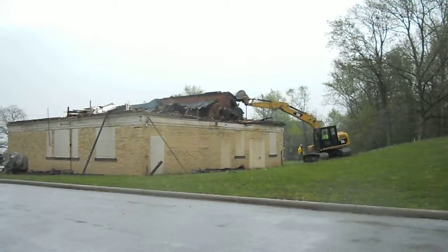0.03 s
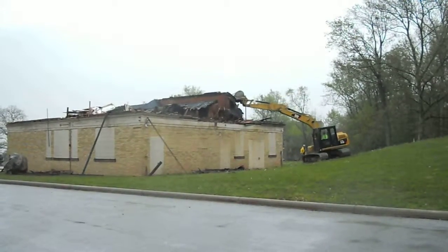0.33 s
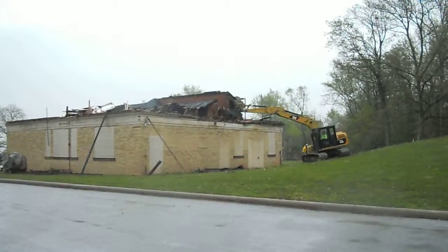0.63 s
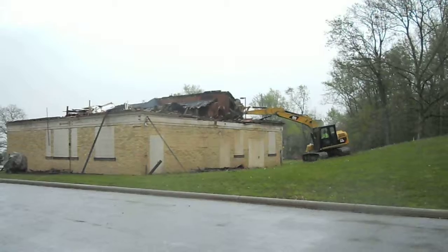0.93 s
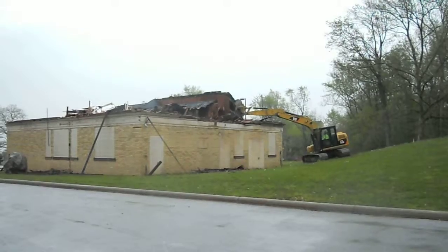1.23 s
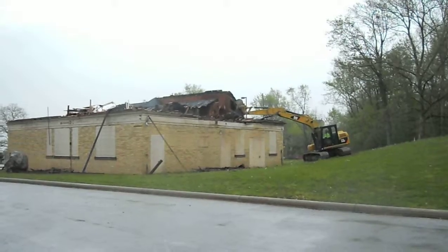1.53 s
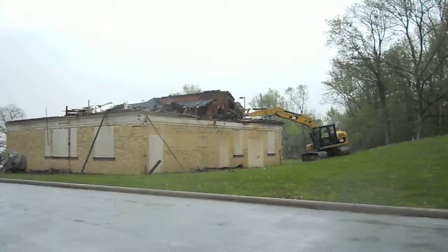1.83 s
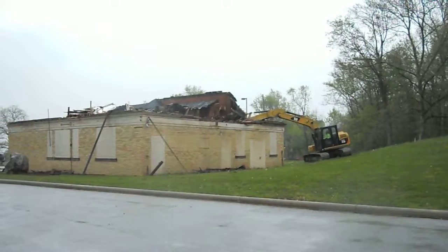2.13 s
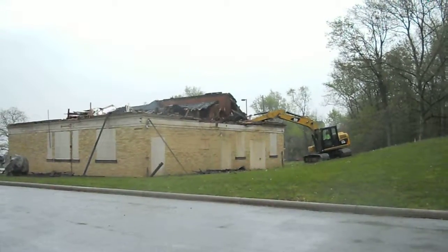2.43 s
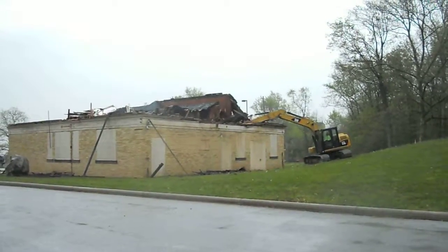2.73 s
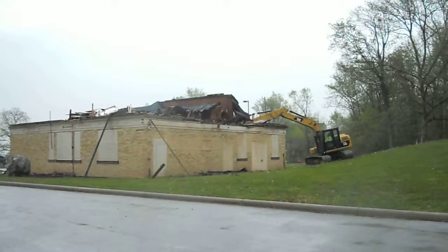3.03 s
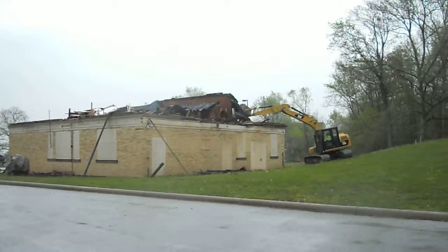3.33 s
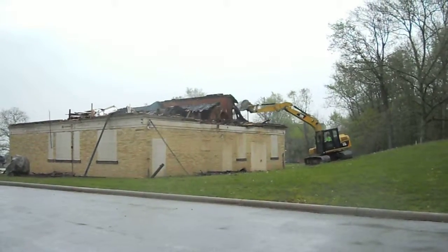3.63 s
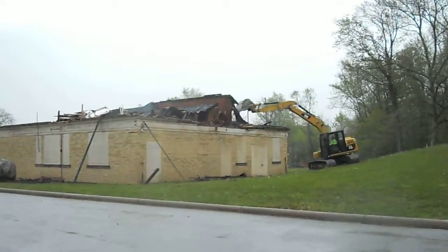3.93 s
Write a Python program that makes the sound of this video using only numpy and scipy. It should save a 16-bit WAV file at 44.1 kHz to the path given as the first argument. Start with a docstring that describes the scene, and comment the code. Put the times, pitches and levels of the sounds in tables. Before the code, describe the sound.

Timber cracks and crunches as a distant excavator tears off a roof, its diesel engine droning throughout. Brief hydraulic hisses come in the first half second, then a loud crack and knock at 0.7 seconds. Splintering, board knocks and low booms continue, echoing dully, until about 2.7 seconds. A short scrape and more cracks follow from 3.2 to 3.5 seconds. Light wind rumbles, and scattered ticks sound close by.

```python
"""A diesel drones and timber cracks as an excavator, some way off, pulls the roof off a brick building.
The engine's firing pulses make the drone, and oil hisses briefly through the hydraulic valves.
Beams break fibre by fibre, boards crunch and knock, the roof deck booms and roofing sheets scrape,
all with a dull echo from walls and trees.
Wind rumbles lightly on the microphone, and a few sharp ticks sound close by."""
import sys
import numpy as np
from scipy import signal
from scipy.fft import rfft, irfft
from scipy.io import wavfile

SR = 44100
rng = np.random.default_rng(int(sys.argv[2]) if len(sys.argv) > 2 else 0)


def pcm_store(signal):
    """Save signal as 16-bit PCM."""
    levels = np.round(np.clip(np.atleast_2d(signal), -1, 1) * 32767)
    wavfile.write(sys.argv[1], SR, levels.astype(np.int16).T)


N = 176400
TIME = np.arange(N) / SR


def amp(db):
    """Amplitude ratio of a level in decibels."""
    return 10 ** (np.asarray(db) / 20)


def rms(x):
    """Root-mean-square amplitude."""
    return np.sqrt(np.mean(x ** 2) + 1e-20)


def unit(x):
    """Normalisation to an rms of 1."""
    return x / rms(x)


def curve(rows):
    """Linear interpolation between (seconds, value) rows."""
    return np.interp(TIME, *np.transpose(rows))


def add(mix, start, sound):
    """Superposition of a sound on the mix, from a start in seconds."""
    part = mix[max(round(start * SR), 0):][:len(sound)]
    part += sound[:len(part)]


def colour(x, spectrum, size=4096):
    """Minimum-phase filtering at unit energy: the (Hz, dB) rows set only the spectral shape."""
    hz, db = np.transpose(spectrum)
    freqs = abs(np.fft.fftfreq(size, 1 / SR)) + 1
    log_gain = np.log(amp(np.interp(np.log(freqs), np.log(hz), db)))
    response = np.exp(np.conj(signal.hilbert(log_gain)))
    taps = np.fft.ifft(response).real[:size // 2]
    return signal.oaconvolve(x, taps / np.linalg.norm(taps))[:len(x)]


def band(hz, width_hz):
    """Noise through a steep resonance; centred on 0 Hz it is a random fluctuation."""
    freqs = np.fft.rfftfreq(N, 1 / SR)
    attenuation = (1 + ((freqs - hz) / width_hz) ** 2) ** 2
    return unit(irfft(rfft(rng.standard_normal(N)) / attenuation, N))


def fractures(per_s, spread_db):
    """Shot noise: tiny fractures are impulses of random time, sign and size."""
    size = amp(spread_db * np.minimum(rng.exponential(1, N), 4))
    return unit(size * rng.choice([-1, 1], N) * (rng.random(N) < per_s / SR))


def burst(start, rise, decay):
    """Envelope of linear growth and exponential decay."""
    t = TIME - start
    return np.clip(t / rise, 0, 1) * np.exp(-np.clip((t - rise) / decay, 0, 40))


# Strength of the buffeting. Each row: time in seconds, level in dB.
GUST_LEVEL = [(0, -50), (.2, -31), (.4, -40), (.6, -26), (.8, -43), (.95, -37), (1.25, -48), (2, -53),
              (2.4, -42), (2.75, -36.5), (3.1, -34), (3.4, -33), (4, -48)]
# Spectrum of the buffeting. Each row: frequency in Hz, relative density in dB.
WIND_SPECTRUM = [(8, 8), (20, 0.5), (45, -3), (90, -4), (200, -40), (800, -51)]

def wind():
    """Turbulence: pressure fluctuations at the microphone make a low rumble."""
    rumble = colour(rng.standard_normal(N), WIND_SPECTRUM, size=16384)
    return unit(rumble) * amp(curve(GUST_LEVEL))


# Engine speed under load. Each row: time in seconds, firing rate in Hz.
FIRING_RATE = [(0, 59.5), (.3, 60.04), (.5, 58.03), (.69, 53.8), (.93, 57.04), (1.4, 57.77), (2.2, 58.42),
               (2.7, 61.9), (3.1, 62.3), (3.35, 60.1), (3.6, 61.94), (4, 64.13)]
# Exhaust strength. Each row: time in seconds, firing tone level in dB, overtone level in dB.
EXHAUST_LEVELS = [(0, -32, -32), (.28, -40, -27.5), (.38, -41, -34.5), (.58, -23, -28.5), (.78, -56, -41),
                  (1.1, -43, -42.5), (1.25, -42, -44), (1.6, -51, -52), (2.3, -45, -49), (2.85, -36, -38.5),
                  (3.3, -29, -39), (3.7, -37.5, -35), (4, -30.5, -41)]
# Exhaust overtones. Each row: multiple of the firing rate, relative level in dB.
ENGINE_ORDERS = [(2, 0), (3, -4.5), (4, -28.5), (4.5, -6.5), (5, -18.5), (6, -9)]
# Strength of the fan and machinery roar. Each row: time in seconds, level in dB.
MACHINERY_LEVEL = [(0, -27.5), (.4, -28.5), (.65, -25.5), (1.05, -30.5), (1.22, -36.5), (1.32, -40),
                   (1.56, -39.5), (1.8, -30.5), (2.3, -28.5), (2.58, -31), (2.9, -30), (3.2, -27),
                   (3.7, -27.5), (4, -29)]
# Spectrum of that roar. Each row: frequency in Hz, relative density in dB.
MACHINERY_SPECTRUM = [(40, -4.5), (90, -1.5), (170, 0.5), (280, -5.5), (390, -9.5), (560, -5.5), (800, -6),
                      (1150, -3.5), (1500, -9.5), (2200, -20), (3200, -12), (4300, -19.5), (5400, -27),
                      (6600, -21.5), (8000, -30.5), (10000, -30.5), (11000, -45), (12000, -52)]

def engine(waver=0.0199, flutter=0.36, throb=0.1, swell_db=1):
    """Periodic excitation: cylinder firing makes the exhaust tones and modulates the machinery roar."""
    firing_hz = curve(FIRING_RATE) * (1 + waver * band(0, 17.6))
    phase = 2 * np.pi * np.cumsum(firing_hz) / SR
    overtones = np.zeros(N)
    for order, db in ENGINE_ORDERS:
        gain = amp(db) * (1 + flutter * band(0, 9.8))
        overtones += gain * np.cos(order * phase + 2 * np.pi * rng.random())
    times, firing_db, overtone_db = np.transpose(EXHAUST_LEVELS)
    exhaust = amp(np.interp(TIME, times, firing_db)) * unit(np.cos(phase))
    exhaust += amp(np.interp(TIME, times, overtone_db)) * unit(overtones)
    roar = colour(rng.standard_normal(N) * (1 + throb * np.cos(phase)), MACHINERY_SPECTRUM)
    roar_db = curve(MACHINERY_LEVEL) + swell_db * band(0, 38)
    return exhaust + amp(roar_db) * unit(roar)


# Valve hisses. Each row: peak time in seconds, half length in seconds, centre in Hz, width in Hz,
# level in dB.
VALVE_HISSES = [(0.464, 0.037, 6540, 1100, -35.5), (0.27, 0.072, 4320, 250, -40.5),
                (.22, 0.015, 6400, 860, -37)]

def hydraulics():
    """Flow noise: oil forced through the valves hisses in brief Gaussian swells."""
    return sum(amp(db) * np.exp(-((TIME - peak) / half) ** 2 / 2) * band(hz, width)
               for peak, half, hz, width, db in VALVE_HISSES)


# Nearby ticks. Each row: start in seconds, level in dB, centre frequency in Hz.
CLOSE_TICKS = [(.069, -22, 5150), (0.07, -15.5, 1490), (0.2168, -9, 5440), (0.792, -19, 7000),
               (0.945, -9.5, 5580), (0.956, -8, 6340), (.97, -28, 8000), (1.34, -30, 4940),
               (1.37, -23, 4200), (1.4385, -23, 6300), (2.307, -21.5, 7300), (2.659, -12, 5210),
               (2.6602, -15, 2880), (3.199, -20, 10000), (3.415, -13.5, 9000), (3.603, -21, 6520)]

def ticks(decay_s=0.00076, width_oct=0.67, size=512):
    """Heavily damped transients: broad bands of noise die so fast that each is heard as a tick."""
    out = np.zeros(N)
    freqs = np.fft.rfftfreq(size, 1 / SR)
    envelope = np.exp(-TIME[:size] / decay_s)
    for start, db, hz in CLOSE_TICKS:
        spectrum = 1 / (1 + (np.log2((freqs + 1) / hz) / width_oct) ** 2)
        noise = irfft(spectrum * np.exp(2j * np.pi * rng.random(len(freqs))))
        add(out, start, amp(db) * rms(envelope) * unit(envelope * noise))
    return signal.sosfilt(signal.butter(14, 9400, fs=SR, output="sos"), out)


def echo(x, gain_db=-9, t60_s=0.32, cutoff_hz=3470, reflections_per_s=1500, gap_s=.012):
    """Scattering: walls and trees return many delayed copies, weaker in the treble."""
    t = TIME[:SR // 2]
    taps = rng.standard_normal(len(t)) * (rng.random(len(t)) < reflections_per_s / SR)
    taps *= amp(-60 * t / t60_s) * (t > gap_s)
    taps = signal.lfilter(*signal.butter(1, cutoff_hz, fs=SR), taps / np.linalg.norm(taps))
    return amp(gain_db) * signal.oaconvolve(x, taps)[:N]


# Slips of the roofing sheets. Each row: start, rise and decay in seconds, centre in Hz, level in dB.
SHEET_SCRAPES = [(3.212, 0.011, 0.017, 4900, -28), (3.24, .012, .025, 4700, -30)]

def scrapes(width_hz=550, chatter_db=1.5):
    """Sliding friction: roofing sheets give a bright rasp whose level chatters."""
    rasp = sum(amp(db) * burst(start, rise, decay) * band(hz, width_hz)
               for start, rise, decay, hz, db in SHEET_SCRAPES)
    return rasp * unit(amp(chatter_db * band(0, 200)))


# Impacts of loose boards. Each row: start in seconds, level in dB, decay in seconds, main mode in Hz,
# second mode in Hz, its level relative to the main mode in dB.
BOARD_KNOCKS = [(.114, -16, 0.011, 1055, 520, -8), (.586, -11, 0.015, 1009, 500, -6),
                (.695, -2, 0.007, 1081, 1232, -7), (1.026, -19, .016, 700, 996, -9),
                (1.118, -18, 0.023, 947, 653, 0), (1.966, -20, 0.017, 617, 870, -7),
                (2.096, -19, 0.01, 1036, 657, 1), (2.226, -20, .012, 873, 1396, -7),
                (2.325, -25, 0.016, 992, 704, -9), (3.209, -22, 0.007, 1128, 2100, -8),
                (3.371, -20, .014, 1020, 870, 2), (3.417, -13.5, 0.0064, 1010, 1600, 1),
                (3.4255, -10.5, 0.0038, 3440, 1710, -10)]

def knocks(rise_s=0.002):
    """Damped free vibration: loose boards strike each other and ring in two modes."""
    out, t = np.zeros(N), TIME[:SR // 4]
    for start, db, decay, hz, second_hz, second_db in BOARD_KNOCKS:
        modes = np.sin(2 * np.pi * hz * t) + amp(second_db) * np.sin(2 * np.pi * second_hz * t)
        envelope = np.minimum(t / rise_s, 1) * np.exp(-t / decay)
        add(out, start, amp(db) * envelope * modes)
    return out


# Flexing of the roof deck. Each row: start, rise and decay in seconds, pitch in Hz, level in dB.
DECK_BOOMS = [(0.101, .008, 0.032, 164.4, -20), (.233, 0.0073, 0.021, 185, -20.5),
              (.52, 0.037, 0.047, 188, -27.5), (.68, 0.0097, .04, 207, -31),
              (.825, 0.01, 0.031, 185.6, -24.5), (.88, 0.022, 0.0089, 166.3, -18.5),
              (0.974, 0.056, 0.039, 181, -22), (1.643, 0.0097, 0.027, 227, -27),
              (1.915, 0.05, 0.052, 249.7, -18), (3.36, 0.015, 0.031, 158.1, -23.5)]

def booms(waver_hz=15.43, noise_ratio=0.44, width_hz=67):
    """Plate resonance: the roof deck resounds at a low, wavering pitch as it gives way."""
    out = np.zeros(N)
    for start, rise, decay, hz, db in DECK_BOOMS:
        envelope = burst(start, rise, decay)
        phase = 2 * np.pi * np.cumsum(hz + waver_hz * band(0, 59.1)) / SR
        flex = np.sin(phase) + noise_ratio * band(hz, width_hz)
        out += amp(db) * rms(envelope) * unit(envelope * flex)
    return out


# Crushing of boards under the bucket. Each row: time in seconds, level in dB.
CRUSH_LEVEL = [(0, -55), (.48, -43), (.66, -43), (.72, -24.5), (.8, -29.5), (.87, -21), (.935, -27),
               (1.02, -22.5), (1.09, -32), (1.22, -40), (1.58, -39), (1.7, -23.5), (1.77, -38.5),
               (1.84, -25.5), (1.88, -28), (1.98, -22.5), (2.14, -29), (2.33, -31.5), (2.39, -38),
               (2.45, -26.5), (2.56, -50.5), (3.15, -42), (3.25, -24.5), (3.3, -27.5), (3.39, -24.5),
               (3.46, -29), (3.52, -42), (3.8, -30), (4, -50)]
# Response of the timber. Each row: frequency in Hz, relative gain in dB.
TIMBER_RESPONSE = [(60, -16.5), (170, 2.5), (270, -11.5), (390, -11.5), (600, 3), (780, -10), (980, 4),
                   (1300, -7), (1750, -7), (2500, -11.5), (3300, -14), (4600, -6.5), (5700, -20.5),
                   (7300, -18.5), (9200, -22.5), (10300, -35.5), (11500, -49)]

def crunch(clump_db=2.5):
    """Acoustic emission: clumps of small fractures are filtered by the resonances of the timber."""
    grains = fractures(per_s=3500, spread_db=3)
    clumps = amp(clump_db * band(0, 55))
    return colour(unit(grains * clumps) * amp(curve(CRUSH_LEVEL)), TIMBER_RESPONSE)


# Breaks in the beams. Each row: start, rise and decay in seconds, ring frequency in Hz,
# then the board, splinter and snap levels in dB.
BEAM_CRACKS = [(0.0979, .0006, 0.012, 696, -18.5, -15, -27.5),
               (0.231, 0.008, 0.032, 1030, -21.5, -28.5, -44),
               (0.521, 0.0063, 0.014, 970, -26.5, -22, -29.5), (0.564, 0.018, 0.02, 1040, -22, -27, -37),
               (.673, 0.0056, 0.019, 1330, -19, -15.5, -25.5),
               (0.6915, 0.0014, 0.0037, 1740, -15.5, -12, -20),
               (0.694, 0.004, 0.0045, 1480, -14.5, -17, -37),
               (.749, 0.0047, 0.012, 1140, -19.5, -20, -30.5), (.824, 0.0099, 0.01, 710, -25.5, -24, -29),
               (0.843, 0.0024, 0.01, 830, -27, -22, -32), (.859, 0.0014, 0.0055, 653, -21, -29, -31),
               (.899, .002, .008, 900, -31, -21, -32), (0.878, 0.0049, 0.013, 1040, -29, -19, -28),
               (0.974, .012, 0.0081, 1060, -25, -14.5, -19), (1.02, 0.013, 0.0092, 686, -25, -27, -41),
               (1.113, 0.0042, 0.026, 910, -29.5, -21.5, -31), (1.336, .004, 0.026, 1040, -32, -36, -43),
               (1.604, 0.0028, 0.0057, 950, -48, -30, -32), (1.625, 0.0018, 0.011, 1020, -31, -23, -39),
               (1.659, 0.0033, 0.015, 910, -23, -24, -39), (1.702, 0.0088, 0.01, 980, -34, -21.5, -37),
               (1.797, 0.022, 0.021, 670, -30.5, -23, -39), (1.913, 0.0054, 0.016, 910, -22.5, -21, -32.5),
               (1.954, 0.015, 0.019, 568, -20, -22.5, -40), (2.026, 0.0074, 0.044, 900, -23.5, -24, -38),
               (2.187, 0.0081, 0.017, 1010, -27.5, -23.5, -36.5), (2.305, .012, .02, 1000, -37, -41, -40),
               (2.41, .004, 0.016, 900, -26, -29, -35.5), (2.659, 0.0044, 0.007, 783, -23.5, -30, -42),
               (2.674, 0.011, 0.02, 910, -32, -27.5, -40), (3.359, 0.01, 0.012, 1130, -18, -22.5, -32.5),
               (3.4145, 0.0019, 0.0056, 1140, -18, -23, -27),
               (3.422, 0.0048, 0.0073, 1070, -19.5, -17.5, -30.5)]
# Response of a board. Each row: multiple of its ring frequency, relative gain in dB.
BOARD_RESPONSE = [(.08, -30), (.2, -14.5), (.38, -8.5), (.58, 4), (1, 5.5), (1.35, -5.5), (1.8, 1),
                  (2.6, -29), (5, -46)]
# Spectrum of the splintering. Each row: frequency in Hz, relative density in dB.
SPLINTER_SPECTRUM = [(800, 6.5), (1700, -4), (2400, -3), (2900, 0), (3700, 4.5), (4800, 5.5), (5700, -7),
                     (9000, -46)]
# Spectrum of the bright snap. Each row: frequency in Hz, relative density in dB.
SNAP_SPECTRUM = [(2500, -26.5), (5000, 0), (6500, 3.5), (7800, 2), (9400, -3), (10500, -9.5), (12000, -50),
                 (16000, -79)]

def cracks(ring_width_hz=99, ring_share=0.3):
    """Brittle fracture: a rush of breaking fibres drives a board's resonance, splinters and snaps."""
    fibres = fractures(per_s=10000, spread_db=2.6)
    boards, splinters, snaps = np.zeros((3, N))
    pole_radius = np.exp(-np.pi * ring_width_hz / SR)
    for start, rise, decay, hz, board_db, splinter_db, snap_db in BEAM_CRACKS:
        span = slice(round(start * SR), round(start * SR) + SR // 4)
        envelope = burst(start, rise, decay)[span]
        strength = rms(envelope)
        force = strength * unit(fibres[span] * envelope)
        body = unit(colour(force, [(ratio * hz, db) for ratio, db in BOARD_RESPONSE]))
        pole = pole_radius * np.exp(2j * np.pi * hz / SR)
        ring = unit(signal.lfilter([1], [1, -pole], force).real)
        board = unit(np.sqrt(1 - ring_share) * body + np.sqrt(ring_share) * ring)
        add(boards, start, amp(board_db) * strength * board)
        add(splinters, start, amp(splinter_db) * force)
        add(snaps, start, amp(snap_db) * force)
    return boards + colour(splinters, SPLINTER_SPECTRUM) + colour(snaps, SNAP_SPECTRUM)


def scene():
    """Superposition: the breaking roof and its echo add to the machine, the wind and the ticks."""
    roof = cracks() + crunch() + booms() + knocks() + scrapes()
    return (roof + echo(roof) + engine() + hydraulics() + wind() + ticks())[None]


def record(dry, ceiling=.73, knee=24, edge_hz=15500):
    """Band limiting and saturation: the microphone loses the top treble and flattens the highest peaks."""
    rolloff = signal.firwin2(255, [0, 10200, 11000, 12000, 12600, SR / 2], [1, 1, .6, .5, .01, 0], fs=SR)
    dull = signal.oaconvolve(dry, rolloff[None], "same")
    saturated = dull / (1 + (dull / ceiling) ** knee) ** (1 / knee)
    band_limit = signal.firwin(511, edge_hz, window=("kaiser", 9), fs=SR)
    return signal.oaconvolve(saturated, band_limit[None], "same")


dry = scene()
out = record(dry)
pcm_store(out)
```